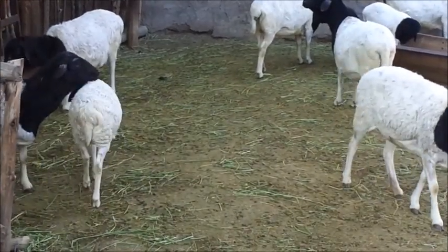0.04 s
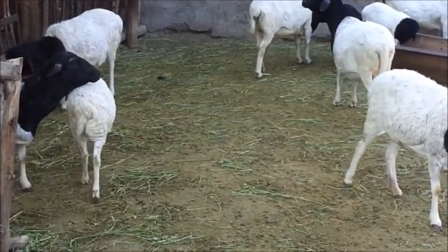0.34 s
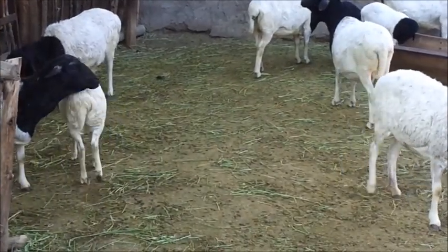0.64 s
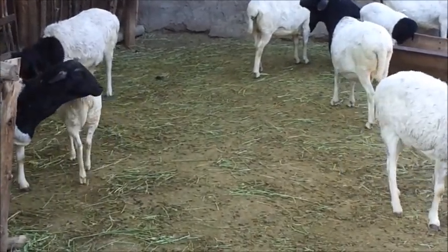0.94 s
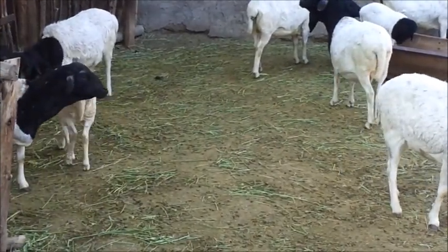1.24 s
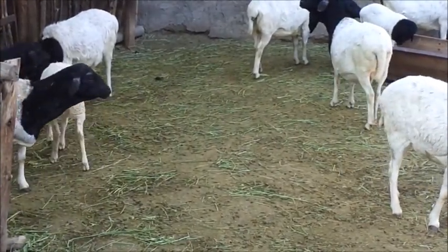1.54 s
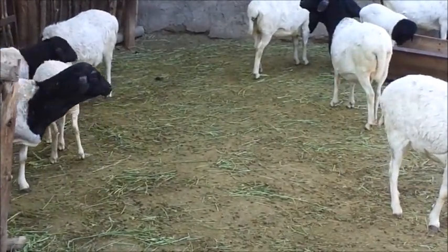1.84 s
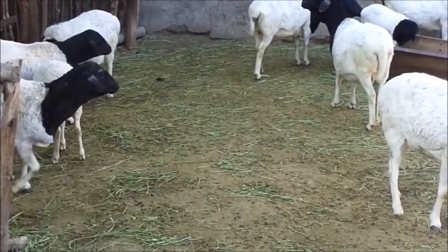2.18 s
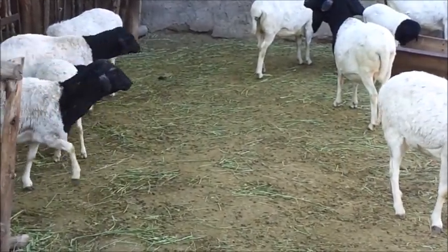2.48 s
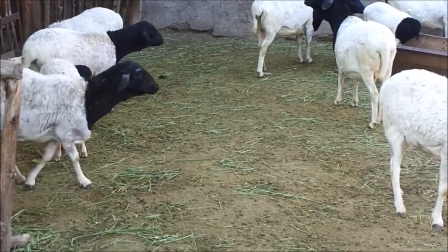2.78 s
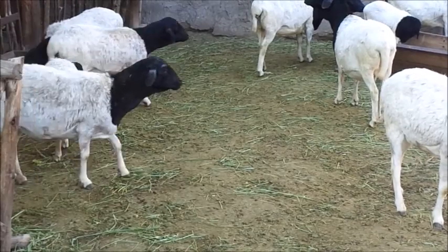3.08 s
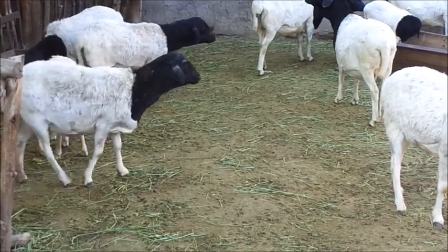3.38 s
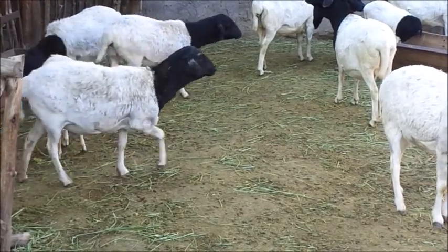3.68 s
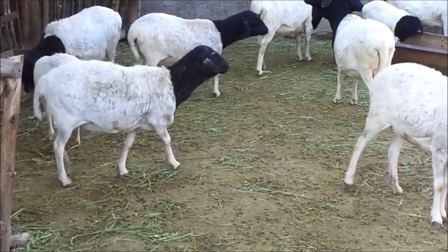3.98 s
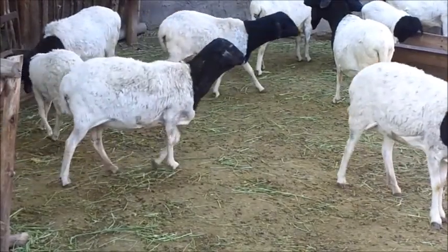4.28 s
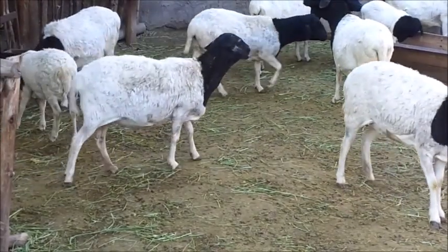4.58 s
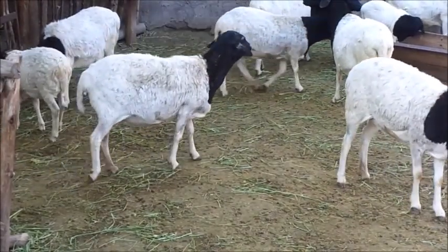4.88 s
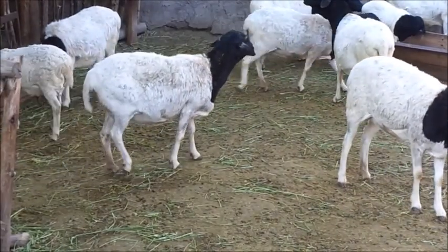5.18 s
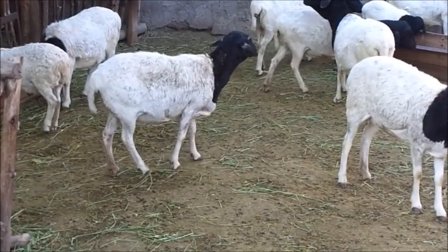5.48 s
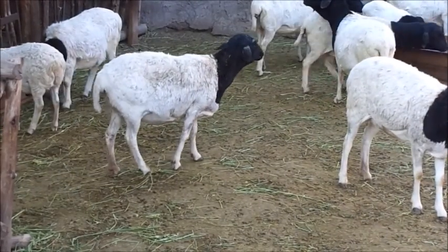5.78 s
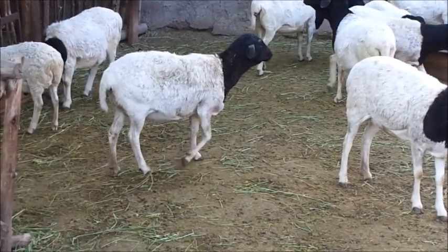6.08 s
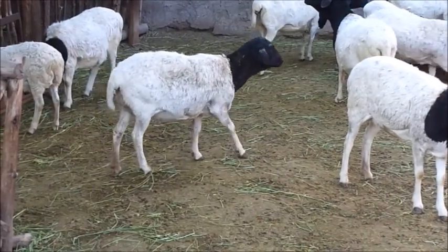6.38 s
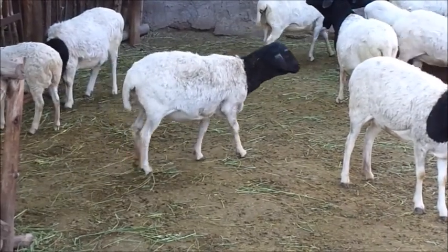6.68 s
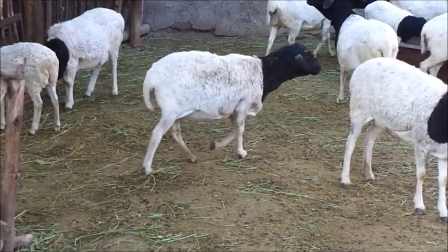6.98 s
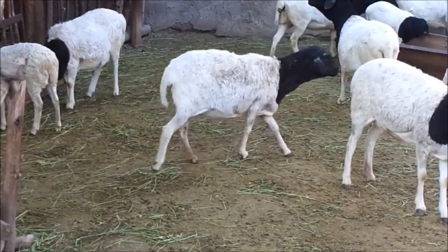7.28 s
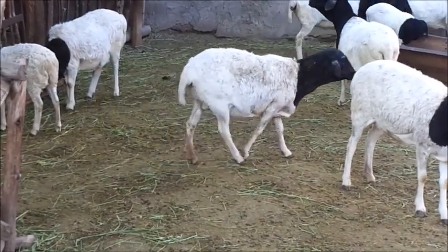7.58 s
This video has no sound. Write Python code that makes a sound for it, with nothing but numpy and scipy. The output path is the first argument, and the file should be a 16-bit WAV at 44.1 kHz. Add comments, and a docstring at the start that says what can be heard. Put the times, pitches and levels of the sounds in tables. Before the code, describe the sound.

Harsh, wavering sheep bleats repeat and answer each other in a pen, cutting out briefly halfway, with low rumble behind.

```python
"""Sheep bleat in a walled pen over a dull outdoor rush: high, harsh voices whose vocal folds tighten
some thirty times a second, so they quaver. Steadier answers overlap them, a thin squeal rides the
second bleat, and hooves thud softly on packed earth. Halfway the sound cuts out for an instant and
returns with a tick. One clear held call ends in a rough croak, and the bleats go on over a distant
rumble with faint whines, which slowly fades and leaves a low hum."""
import sys
import numpy as np
from scipy import signal
from scipy.fft import rfft, irfft, next_fast_len
from scipy.io import wavfile
from scipy.ndimage import uniform_filter1d, map_coordinates

SR = 44100
rng = np.random.default_rng(int(sys.argv[2]) if len(sys.argv) > 2 else 0)


def pcm_store(signal):
    """Save signal as 16-bit PCM."""
    levels = np.round(np.clip(np.atleast_2d(signal), -1, 1) * 32767)
    wavfile.write(sys.argv[1], SR, levels.astype(np.int16).T)


N = 336924
TIME = np.arange(N) / SR


def amp(db):
    """Decibels to gain."""
    return 10 ** (np.asarray(db) / 20)


def unit_rms(x):
    """Scale to rms 1."""
    return x / np.sqrt(np.mean(x ** 2) + 1e-20)


def at_hz(points, hz):
    """Interpolate (freq_hz, value) points on a log axis."""
    freqs, values = np.transpose(points)
    return np.interp(np.log(hz + 1), np.log(freqs), values)


def curves(rows):
    """Interpolate each column after time_s over the scene."""
    times, *columns = np.transpose(rows)
    return [np.interp(TIME, times, column) for column in columns]


def wobble(rate_hz, t):
    """Smooth random curve, rate_hz knots a second."""
    place = (t - t[0]) * rate_hz
    return map_coordinates(rng.standard_normal(int(place[-1]) + 4), [place])


def hump(x):
    """Steep-sided bump of height 1 between -1 and 1."""
    return np.exp(-np.abs(x) ** 4)


def filtered(x, response):
    """Apply a gain given as a function of frequency."""
    size = next_fast_len(N + SR // 2)
    return irfft(rfft(x, size) * response(np.fft.rfftfreq(size, 1 / SR)), size)[..., :N]


def noise(colour, patchy_db):
    """Coloured noise of rms 1 with drifting patches of gain."""
    spectrum = signal.stft(rng.standard_normal(N), nperseg=1024)[2]
    patches = uniform_filter1d(rng.standard_normal(spectrum.shape), size=4, axis=0)
    patches = uniform_filter1d(patches, size=14, axis=1)
    patchy = signal.istft(spectrum * amp(patchy_db * unit_rms(patches)), nperseg=1024)[1][:N]
    return unit_rms(filtered(patchy, lambda hz: amp(at_hz(colour, hz))))


EDGE_S, DROOP_DB = .005, 3
COLLAPSE_S, COLLAPSE_SHARE, COLLAPSE_DB = .06, .16, 12.5


def breath(start_s, length_s, top_hz, level_db, swell_db, peak_s, arch, sag):
    """One push of air: pitch arches with effort, level swells and droops, then both collapse."""
    span = slice(*np.searchsorted(TIME, [start_s - EDGE_S / 2, start_s + length_s + EDGE_S]))
    age = TIME[span] - start_s
    effort = np.sin(np.pi * np.clip(age / length_s, 0, 1))
    collapse = np.clip(1 - (length_s - age) / COLLAPSE_S, 0, 1)
    pitch_hz = top_hz * (1 - arch * (1 - effort) - sag * (age / length_s - .5))
    pitch_hz *= 1 - COLLAPSE_SHARE * collapse ** 1.3
    shape_db = np.interp(age, [0, np.clip(peak_s, 0, length_s), length_s], [-swell_db, 0, -DROOP_DB])
    return span, age, effort, pitch_hz, level_db + shape_db - COLLAPSE_DB * collapse ** 2


def tremor(rate_hz, spread_hz):
    """Uneven flutter of the folds, peak 1."""
    return np.sin(2 * np.pi * np.cumsum(rate_hz + spread_hz * wobble(12, TIME)) / SR)


FIRST_THROB_S, SETTLE_S, STUMBLE_BEATS = .025, .02, .035
SLOWING_SHARE, EASING_SHARE, SCATTER_SHARE = .2, .15, .2


def throbbing(age, length_s, effort, rate_hz, steady_at_s, steady_for_s, rise, half_s, calming):
    """The folds tighten in humps, quicker and shallower at full effort, calmer for one stretch."""
    def beats(s):
        lag_s = SLOWING_SHARE * length_s / np.pi * np.cos(np.pi * s / length_s)
        return rate_hz * ((1 - SLOWING_SHARE) * s - lag_s)
    beat = beats(age) - beats(FIRST_THROB_S) + STUMBLE_BEATS * wobble(60, age)
    calm = calming * np.clip((steady_for_s / 2 - np.abs(age - steady_at_s)) / SETTLE_S + .5, 0, 1)
    air_left = np.clip(2 * (length_s - age) / COLLAPSE_S - 1, 0, 1)
    scatter = 1 + SCATTER_SHARE * wobble(30.14, age)
    strength = (1 - EASING_SHARE * effort) * (1 - calm) * air_left * scatter
    return rise * strength * hump((beat - np.round(beat)) / rate_hz / half_s)


JITTER_SHARE, CROAK_DB, HISS_DB = .007, -8.5, -29.5


def bleat(span, pitch_hz, level_db, tight, throat, mouth_db_oct, choke_db, rasp_rad, croak_hz):
    """One call: harmonics of the vocal folds slide through the throat's resonances."""
    t = TIME[span]
    # slack folds croak: ragged, alternating cycles add lines between the harmonics
    slack = np.clip((croak_hz - pitch_hz) / 90, 0, 1)
    pitch_hz = pitch_hz * (1 + tight)
    jitter = (JITTER_SHARE + .025 * slack) * wobble(260, t)
    shimmer_db = (.8 + 1.7 * slack) * wobble(300, t) - 2 * slack
    phase = 2 * np.pi * np.cumsum(pitch_hz * (1 + jitter)) / SR + rasp_rad * wobble(1100, t)
    voice = np.zeros(len(t))
    for multiple in np.arange(2, 29) / 2:
        hz = multiple * pitch_hz
        gain = amp(at_hz(throat, hz) + mouth_db_oct * np.clip(np.log2(hz / 3000), -1, 1))
        source = 1 if multiple % 1 == 0 else slack * amp(CROAK_DB)
        voice += gain * source * np.sin(multiple * phase)
    # air hisses through the folds, one puff per cycle
    treble = signal.butter(2, [6000, 10500], "band", fs=SR, output="sos")
    hiss = signal.sosfilt(treble, rng.standard_normal(len(t)))
    voice += amp(HISS_DB + mouth_db_oct) * hiss * (1 + np.cos(phase))
    gate = np.clip(np.minimum(t - t[0], t[-1] - t) / EDGE_S, 0, 1)
    # a tight larynx passes less air, so the call pulses
    choke = np.tanh(np.maximum(tight, 0) / .09) - .2
    out = np.zeros(N)
    out[span] = np.sqrt(2) * voice * gate * amp(level_db - choke_db * choke + shimmer_db)
    return out


# throat resonances of the early, late and clear held calls: freq_hz, gain_db
EARLY_THROAT = [(1000, -11), (1550, 2.5), (2050, -2.5), (2500, -5), (3050, 4), (3500, -2.5), (4200, -5),
                (4750, -18.5), (5250, -15.5), (7000, -37.5), (9200, -30), (15000, -52.5)]
LATE_THROAT = [(1000, -16), (2050, -2.5), (2500, -8.5), (3000, 4.5), (3450, -1), (3900, -2), (4900, -16.5),
               (5450, -11), (6000, -31), (6900, -24), (9000, -30), (15000, -45)]
CLEAR_THROAT = [(1000, -37), (2000, -4.5), (3800, 1), (4800, -6.5), (5800, -18), (7000, -24),
                (11500, -28.5), (13500, -58)]
# folds by voice: arch_share, sag_share, rasp_rad, croak_hz
VOICES = {"early": (.085, 0, .045, 924), "late": (.065, .015, 0.02, 945),
          "clear": (.008, .035, 0.0081, 925), "answer": (.035, 0, 0.06, 931)}
# larynx throbs by voice: rise_share, half_width_s, calming_share
THROBS = {"early": (.145, .0095, .55), "late": (.17, .008, .85), "clear": (.15, .008, 0.93)}
# slips of the folds: time_s
SLIPS = [0.24, 0.269, 0.301, 0.448, 0.878, 1.311, 1.595, 2.573, 3.215]
SLIP_SHARE, SLIP_HALF_S = .12, .005
# quavering calls: start_s, length_s, top_hz, level_db, swell_db, peak_s, throb_hz,
# steady_at_s, steady_for_s, choke_db, mouth_db_oct, voice
BLEATS = [(-0.24, 0.34, 1057, -36.5, -2, 0.24, 30.3, .12, .1, 4, 0.5, "early"),
          (0.15, 0.34, 1018, -34, 9, 0.2, 36.5, 0.19, .02, 7.5, 2, "early"),
          (0.635, 0.32, 1010, -37.5, 3.5, .08, 34, .14, .1, 4, 0, "early"),
          (1.119, 0.31, 1031, -41, 5, .17, 31, 0.23, 0.084, 7.5, -0.5, "early"),
          (1.586, 0.32, 1017, -40, 6.5, 0.22, 31.2, 0.07, 0.071, 4.5, 3.8, "early"),
          (2.064, 0.3, 1012, -39, 3, 0.11, 36.3, 0.11, 0.042, 7.5, 0.7, "early"),
          (2.494, .4, 1044, -41.5, 6.5, 0.14, 31, 0.29, 0.21, 2, 0, "early"),
          (3.084, 0.3, 1034, -42.5, 2, 0.18, 35, 0.25, 0.14, 0.5, 4, "early"),
          (3.558, .35, 1051, -41.5, 4.5, .17, 30, .17, 0.13, 0.5, 5.5, "early"),
          (4.525, 0.35, 951, -44.5, -1.5, .15, 31, .22, .355, 0, 0.5, "clear"),
          (5.223, .37, 986, -43, -2, 0.086, 31.4, .127, .112, 0.5, 4.5, "late"),
          (5.891, .39, 976.4, -41.5, 1.5, 0.23, 31.3, .19, 0.061, 1, 3.5, "late"),
          (6.534, .368, 977, -43, 1, 0.25, 31.5, 0.18, .09, 0, 2, "late"),
          (7.155, .38, 978, -41.5, 3.5, 0.32, 30.5, 0.24, 0.044, 2.5, 1.3, "late")]


def quavering_bleats():
    """Near voices throb and flutter; now and then the folds slip and the pitch cracks downward."""
    throats = {"early": EARLY_THROAT, "late": LATE_THROAT, "clear": CLEAR_THROAT}
    flutter = .007 * tremor(rate_hz=33, spread_hz=4.98)
    slip = SLIP_SHARE * sum(hump((TIME - time_s) / SLIP_HALF_S) for time_s in SLIPS)
    out = np.zeros(N)
    for start_s, length_s, *shape, throb_hz, at_s, for_s, choke_db, mouth_db_oct, voice in BLEATS:
        arch, sag, rasp_rad, croak_hz = VOICES[voice]
        span, age, effort, pitch_hz, level_db = breath(start_s, length_s, *shape, arch, sag)
        tight = throbbing(age, length_s, effort, throb_hz, at_s, for_s, *THROBS[voice]) + flutter[span]
        pitch_hz *= 1 - slip[span]
        out += bleat(span, pitch_hz, level_db, tight, throats[voice], mouth_db_oct,
                     choke_db, rasp_rad, croak_hz)
    return out


# rush spectrum: freq_hz, gain_db
RUSH_COLOUR = [(30, -15), (80, -10), (120, -12.5), (280, -14.5), (750, 0), (1050, -2), (1500, -7.5),
               (2100, -11.5), (4500, -23.5), (15000, -29)]
# rush contour: time_s, relative_db
RUSH = [(0, -52.5), (3.6, -57), (3.92, -58.5), (6.5, -55.5)]


def rush(gain_db, patchy_db):
    """Dull, slowly drifting noise."""
    contour_db, = curves(RUSH)
    return amp(contour_db + gain_db) * noise(RUSH_COLOUR, patchy_db)


# throat resonances: freq_hz, gain_db
ANSWER_THROAT = [(1100, -4.5), (1600, 4), (2150, -2.5), (2600, -21.5), (3200, 1.5), (3700, -5), (4400, -3),
                 (5000, -30.5), (5600, -14), (7000, -29), (9200, -28), (15000, -42)]
# answers and, at 4.844 s, the croaking end of the clear held call:
# start_s, length_s, top_hz, level_db, swell_db, peak_s, mouth_db_oct
ANSWERS_AND_CROAK = [(0.081, 0.46, 1090, -50.5, 8, 0.2, 3.5), (0.679, 0.33, 1115, -48, 1, .08, 1),
                     (0.985, .06, 1150, -43, 5, .025, 0.6), (1.131, 0.53, 1123, -46, 4, 0.34, 4),
                     (1.607, 0.13, 1140, -43.5, 7, 0.086, -1), (1.799, 0.5, 1120, -50, 2, .12, 1),
                     (2.561, 0.29, 1133, -48, 7, 0.079, -1), (3.2, 0.26, 1155, -47.5, 9.5, 0.15, 1.5),
                     (3.44, 0.09, 1140, -48, 4, 0.02, 1), (3.619, 0.32, 1120, -51, 6.5, .08, 2),
                     (4.844, 0.078, 1070, -55.5, 8, 0.024, -6.5), (5.632, 0.4, 1065, -56, -1, 0.4, 1.5),
                     (6.841, 0.13, 1046, -52.5, 8, 0.049, 3), (7.424, 0.39, 1088, -49, 8.5, 0.29, 2.8)]


def answers_and_croak():
    """Answering bleats and the held call's rough end; tremor deepens into pulses as the air runs out."""
    arch, sag, rasp_rad, croak_hz = VOICES["answer"]
    flutter = tremor(rate_hz=30, spread_hz=4)
    out = np.zeros(N)
    for start_s, length_s, *shape, mouth_db_oct in ANSWERS_AND_CROAK:
        span, age, _, pitch_hz, level_db = breath(start_s, length_s, *shape, arch, sag)
        spent = np.clip((age - length_s) / .15 + 1, 0, 1)
        tight = (.01 + .03 * spent) * flutter[span]
        out += bleat(span, pitch_hz, level_db, tight, ANSWER_THROAT, mouth_db_oct,
                     choke_db=8, rasp_rad=rasp_rad, croak_hz=croak_hz)
    return out


# wall echo decay: freq_hz, t60_s
PEN_DECAY = [(200, 0.31), (3000, 0.98), (10000, 0.33)]


def pen_echo(x):
    """The walls return a short diffuse tail, 5 ms late."""
    hz, t, spectrum = signal.stft(rng.standard_normal(SR), SR, nperseg=256)
    decay = amp(-60 * t / at_hz(PEN_DECAY, hz)[:, None])
    tail = signal.istft(spectrum * decay, SR, nperseg=256)[1]
    response = np.pad(tail, (SR // 200, 0)) / np.linalg.norm(tail)
    return signal.fftconvolve(x, response)[:N]


# squeal contour: time_s, pitch_hz, level_db
SQUEAL = [(0.177, 4530, -45.5), (0.2, 4246, -34.5), (0.255, 4370, -44), (0.29, 4340, -28.5),
          (0.305, 4100, -43.5)]


def squeal():
    """A thin, unsteady whistle over the second bleat."""
    pitch_hz, level_db = curves(SQUEAL)
    pitch_hz *= 1 + .0196 * wobble(180, TIME)
    gate = np.clip(np.minimum(TIME - SQUEAL[0][0], SQUEAL[-1][0] - TIME) / .0036, 0, 1)
    return gate * amp(level_db) * np.sin(2 * np.pi * np.cumsum(pitch_hz) / SR)


# hoof falls: time_s, relative_db
HOOVES = [(0.599, -52), (2.089, -50), (3.429, -57)]


def hooves():
    """Soft, low thuds on packed earth."""
    blows = sum(amp(db - 6.5) * np.exp(-((TIME - time_s - .006) / .012) ** 2) for time_s, db in HOOVES)
    earth_colour = [(30, -16), (70, -12), (200, .5), (400, -23), (1500, -60)]  # freq_hz, gain_db
    return blows * noise(earth_colour, patchy_db=1.5)


# rumble spectra: freq_hz, gain_db
DEEP_COLOUR = [(25, -1), (80, -6), (180, 2), (280, -15), (600, -39)]
ROAR_COLOUR = [(300, -12), (550, -10), (750, -0.5), (1100, -3), (1650, -3), (1850, -0.5), (2200, -13.5),
               (3500, -29), (6000, -89)]
# rumble fade: time_s, deep_db, roar_relative_db
RUMBLE = [(4.1, -57.5, -51.5), (5.5, -63, -54.5), (6.1, -64.5, -58.5), (6.7, -70.5, -64)]


def distant_rumble():
    """Deep noise and a midrange roar fade together."""
    deep_db, roar_db = curves(RUMBLE)
    deep = amp(deep_db) * noise(DEEP_COLOUR, patchy_db=1.5)
    roar = amp(roar_db + 4.5) * noise(ROAR_COLOUR, patchy_db=3)
    return deep + roar


# whines in the rumble: start_s, end_s, pitch_hz, level_db
WHINES = [(3.85, 4.45, 1826, -54), (4.844, 6.35, 1420, -56.5), (5.298, 6.605, 1070, -59)]


def whines():
    """Narrow, fuzzy tones swell and fade."""
    out = np.zeros(N)
    for start_s, end_s, pitch_hz, level_db in WHINES:
        progress = np.clip((TIME - start_s) / (end_s - start_s), 0, 1)
        swell = np.sqrt(np.abs(np.sin(np.pi * progress)))
        fuzz = wobble(45, TIME) + 1j * wobble(45, TIME)
        out += amp(level_db) * swell * np.real(fuzz * np.exp(2j * np.pi * pitch_hz * TIME))
    return out


# hum contour: time_s, level_db
HUM = [(6.3, -75), (6.6, -67.5), (7.3, -59), (7.64, -67)]


def hum():
    """A low, wavering tone with a weak octave swells near the end."""
    level_db, = curves(HUM)
    pitch_hz = 73.3 + .5 * wobble(2.16, TIME)
    phase = 2 * np.pi * np.cumsum(pitch_hz) / SR
    return amp(level_db) * (np.sin(phase) + .15 * np.sin(2 * phase))


CUT_S, RESUME_S = 3.798, 3.919


def scene():
    """All centred, with a very faint noise differing left and right; no echo crosses the dropout."""
    lead = quavering_bleats() + squeal()
    backing = answers_and_croak()
    spill = amp(-13) * lead + amp(-4.5) * backing
    before = TIME < RESUME_S
    echo = pen_echo(spill * ~before) + pen_echo(spill) * before
    middle = lead + backing + echo + hooves() + rush(gain_db=3.5, patchy_db=2)
    middle += (distant_rumble() + whines() + hum()) * (TIME > CUT_S)
    side_noise = rush(gain_db=-31, patchy_db=6)
    return np.array([middle + side_noise, middle - side_noise])


DROPOUT_DB, BAND_LIMIT_HZ = -51.5, 15050
TICK_DB, TICK_DECAY_S, TICK_HZ = -32, .00057, 3400


def record(dry):
    """The sound drops out and returns with a tick; nothing passes above the band limit."""
    gain = np.where((TIME < CUT_S) | (TIME > RESUME_S), 1, amp(DROPOUT_DB))
    age = np.maximum(TIME - RESUME_S, 0)
    tick = amp(TICK_DB) * np.exp(-age / TICK_DECAY_S) * np.sin(2 * np.pi * TICK_HZ * age)
    return filtered(dry * gain + tick, lambda hz: hz < BAND_LIMIT_HZ)


dry = scene()
out = record(dry)
pcm_store(out)
```